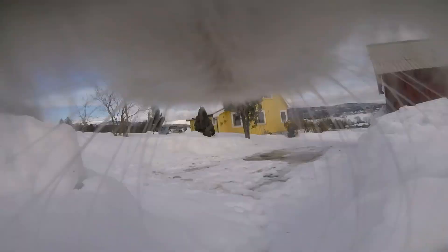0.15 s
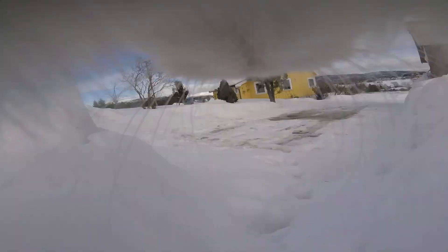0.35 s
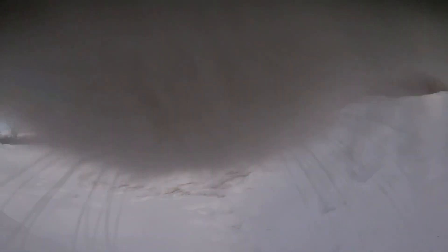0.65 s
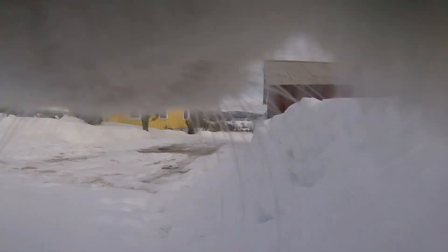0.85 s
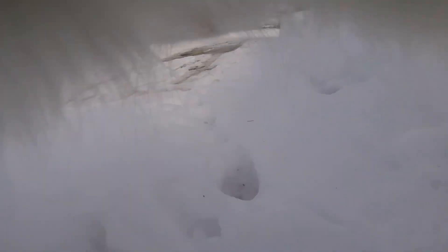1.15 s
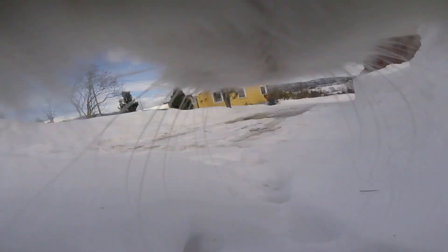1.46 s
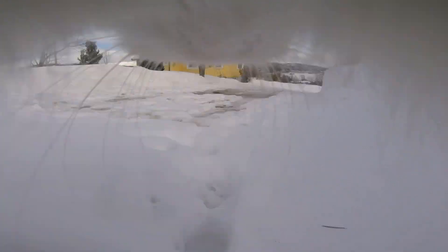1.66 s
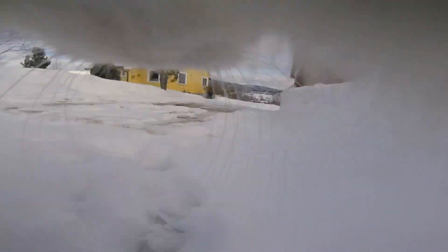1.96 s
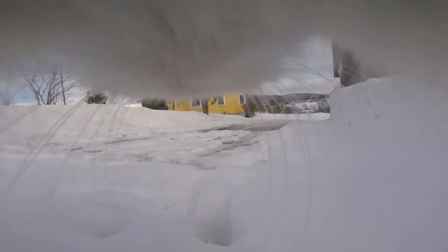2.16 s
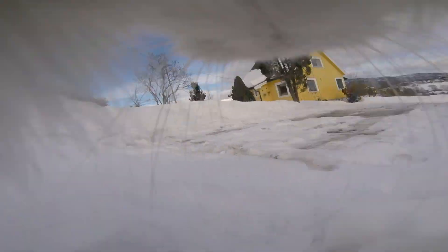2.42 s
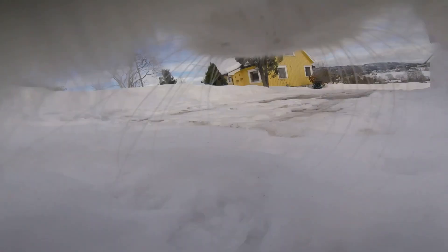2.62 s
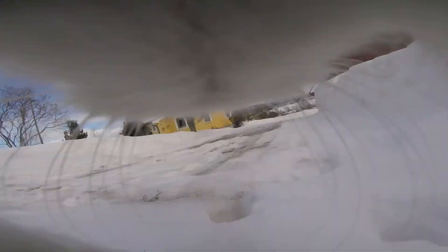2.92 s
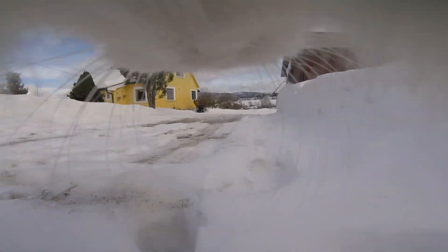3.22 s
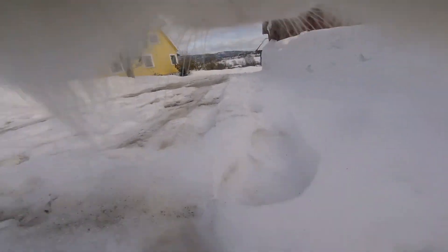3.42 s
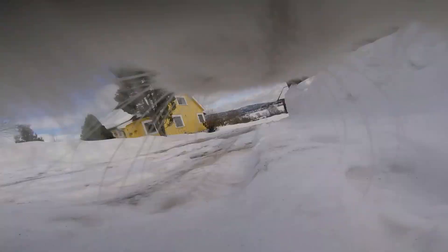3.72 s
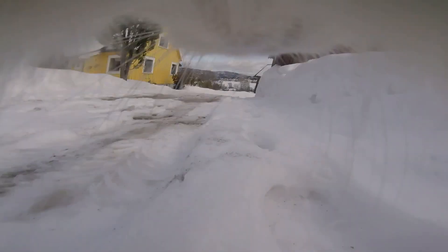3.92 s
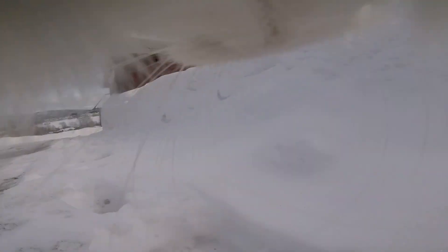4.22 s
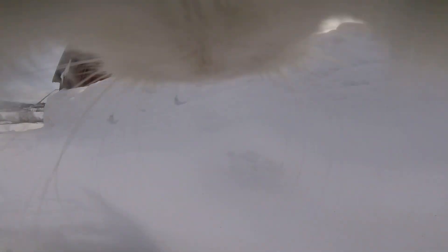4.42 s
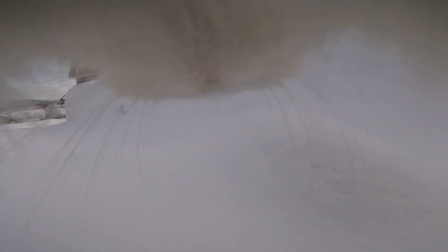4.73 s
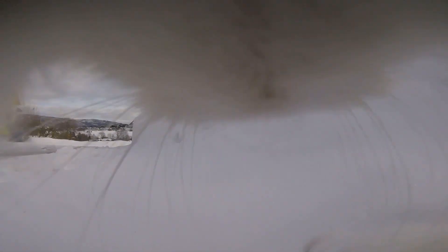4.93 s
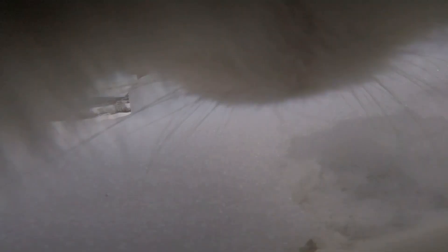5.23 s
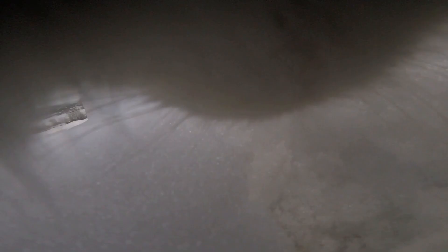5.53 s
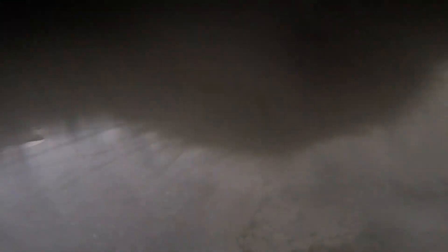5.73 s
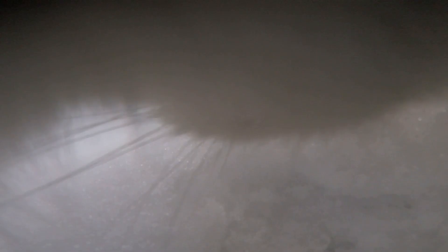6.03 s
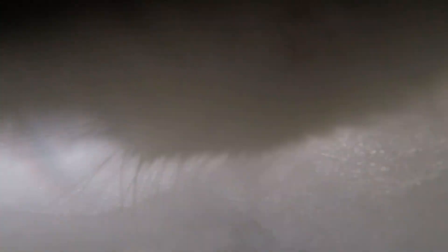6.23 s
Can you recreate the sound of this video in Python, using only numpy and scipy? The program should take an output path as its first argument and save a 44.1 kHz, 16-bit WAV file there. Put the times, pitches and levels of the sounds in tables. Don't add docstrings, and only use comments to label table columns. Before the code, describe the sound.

Very close, dry outdoor sound from a microphone against a cat's chest. Deep rumbling sways and dull knocks come with uneven steps, mixed with soft fur rustle, tiny hard plastic ticks and brief crunches of frozen snow. Activity builds to a heavy jolting passage around the middle, eases to light rubbing and isolated ticks, then a crisp crunch and a last few bumps over faint air hiss.

```python
import sys
import numpy as np
from scipy import signal
from scipy.fft import rfft, irfft, next_fast_len
from scipy.io import wavfile
from scipy.ndimage import uniform_filter1d

SR = 44100
rng = np.random.default_rng(int(sys.argv[2]) if len(sys.argv) > 2 else 0)


def elevation(decibels):
    levels = np.asarray(decibels, float)
    return 10 ** (levels / 20)


def dump(signal):
    limited = np.clip(np.atleast_2d(signal).T, -1, 1)
    pcm = np.round(limited * 32767).astype(np.int16)
    wavfile.write(sys.argv[1], SR, pcm)


N = 280917


def rms_one(x):
    return x / np.sqrt(np.mean(x ** 2) + 1e-20)


def band(x, low_hz, high_hz, order=2):
    return signal.sosfilt(signal.butter(order, [low_hz, high_hz], "band", fs=SR, output="sos"), x)


def soften(x, memory):
    return signal.lfilter([1], [1, -memory], x)


def ring(clicks, hz, t60):
    r = elevation(-60 / (t60 * SR))
    w = 2 * np.pi * hz / SR
    return signal.lfilter([0, np.sin(w)], [1, -2 * r * np.cos(w), r * r], clicks + 1e-18)


def evened(x, share, span_s):
    envelope = np.abs(signal.hilbert(x, next_fast_len(N))[:N])
    swell = uniform_filter1d(envelope, max(round(span_s * SR), 1))
    return rms_one(x / (swell + 1e-9) ** np.clip(share, 0, 1))


def grains(per_s, spread_db, smooth):
    sizes = elevation(spread_db * np.minimum(rng.exponential(1, N), 5)) * rng.choice([-1, 1], N)
    slips = rms_one(sizes * (rng.random(N) < per_s / SR))
    return rms_one(slips + smooth * rng.standard_normal(N))


def swells(rows, rest_db):
    t = np.arange(0, N, 64) / SR
    s, db, rise, fall = np.transpose(rows)[:, :, None]
    fading_db = db - 20 * np.where(t < s, (s - t) / rise, (t - s) / fall)
    power = elevation(2 * rest_db) + elevation(2 * fading_db).sum(axis=0)
    return np.interp(np.arange(N) / SR, t, 10 * np.log10(power))


# centre in Hz, width in Hz, level in dB.
PORT_BANDS = [
    (5443, 1140, 24),
    (7660, 500, -15),
    (4200, 500, 2),
    (6280, 1300, 7),
]


def port(x):
    bands = sum(elevation(db) * band(x, hz - width / 2, hz + width / 2) for hz, width, db in PORT_BANDS)
    return band(bands, 3500, 9000)


# peak in seconds, swing level in dB, time to die by 20 dB in seconds.
SWINGS = [(0.0, -36, .06), (0.32, -33, .1), (0.45, -47, .5), (0.89, -32, .16), (1.02, -44, .1),
          (1.17, -45, .5), (1.45, -40, .4), (1.93, -36, .2), (2.14, -49, .9), (2.41, -25, .3),
          (2.52, -29, .12), (2.66, -34, .2), (2.78, -32, .08), (2.98, -42, .9), (3.22, -36, .12),
          (3.44, -30, .3), (3.49, -29, .04), (3.61, -30, .06), (3.9, -37, .1), (4.44, -42.5, .3),
          (4.82, -47, .3), (5.05, -39, .4), (5.33, -39.5, .15), (5.5, -42, .5), (5.8, -50, .9),
          (6.12, -39, .9), (6.31, -42, .15)]
# peak in seconds, shudder level in dB, time to die by 20 dB in seconds.
SHUDDERS = [(0.2, -49.5, .08), (0.3, -55, .9), (0.8, -54, .3), (1.09, -44, .1), (1.27, -46, .3),
            (1.35, -39, .1), (1.49, -40, .15), (1.68, -50, .5), (2.43, -36.5, .15), (2.64, -40, .09),
            (2.78, -40, .15), (2.99, -39, .07), (3.26, -57, .5), (3.44, -40.5, .1), (3.52, -37, .1),
            (3.6, -34, .07), (3.845, -37, .03), (4.18, -54, .12), (4.44, -46, .2), (4.86, -49, .4),
            (5.29, -46, .1), (5.33, -37, .07), (5.6, -43, .07), (5.77, -54, .5), (6.13, -35, .16),
            (6.37, -35.5, .1)]


def sway():
    rise_s = 0.06
    swing_db = swells([(s, db, rise_s, fall) for s, db, fall in SWINGS], rest_db=-57)
    shudder_db = swells([(s, db, rise_s, fall) for s, db, fall in SHUDDERS], rest_db=-63)

    swing = elevation(swing_db) * evened(band(rng.standard_normal(N), 14.3, 31.7), share=0.68, span_s=0.038)
    swing = rms_one(band(swing, 3.4, 58)) * np.sqrt(np.mean(elevation(swing_db) ** 2))

    rumble = soften(rng.standard_normal(N), 0.995)
    shudder = evened(band(rumble, 33, 127), share=0.59, span_s=0.019)

    opening_step, opening_fall_s = -0.062, 0.011
    opening = opening_step * np.exp(-np.arange(N) / SR / opening_fall_s)
    return swing + elevation(shudder_db - 1.0) * shudder + opening


# frequency in Hz, level in dB per Hz.
HISS_COLOUR = [(60, 2), (200, -4), (500, -9), (1000, -10), (2000, -18), (3200, -35), (4300, -35),
               (5300, -14.5), (8000, -12), (11000, -14.5), (13000, -19.5), (14000, -30)]
# time in seconds, level in dB.
AIR = [
    (0, -76.5),
    (1.2, -74.5),
    (2.5, -72),
    (3.4, -71.5),
    (3.9, -76),
    (4.8, -73.5),
    (5.5, -72),
    (6.37, -70.5),
]


def hiss():
    hz = np.fft.rfftfreq(N, 1 / SR)
    shape_hz, shape_db = np.transpose(HISS_COLOUR)
    colour = elevation(np.interp(np.log(hz + 1), np.log(shape_hz), shape_db, left=-60))
    noise = rms_one(irfft(rfft(rng.standard_normal(N)) * colour, N))

    air_s, air_db = np.transpose(AIR)
    level_db = np.interp(np.arange(N) / SR, air_s, air_db)
    gusts = rms_one(band(rng.standard_normal(N), 1.0, 6.0, order=1))
    return elevation(level_db + 1.5 * gusts) * noise


# peak in seconds, drag level in dB,
# time to grow by 20 dB in seconds, time to die by 20 dB in seconds.
DRAGS = [(0.03, -61.5, .1, .12), (0.252, -51.5, .105, .1), (0.432, -55, .15, .19), (0.83, -57, .14, .16),
         (1.095, -59, .3, .5), (1.3, -45.5, .025, .19), (1.515, -47.5, .1, .14), (1.8, -59, .15, .3),
         (1.868, -50, .1, .17), (1.993, -52.5, .08, .24), (2.44, -47, .13, .22), (2.617, -46, .05, .11),
         (2.77, -54, .09, .1), (3.1, -59, .6, .05), (3.235, -55.5, .17, .05), (3.44, -51, .13, .3),
         (3.57, -53, .3, .07), (3.794, -54, .04, .15), (3.844, -56, .1, .05), (3.97, -58, .14, .055),
         (4.173, -63, .12, .07), (4.35, -64, .15, .28), (4.687, -63, .15, .14), (4.83, -60, .06, .9),
         (5.11, -58, .6, .12), (5.295, -55, .3, .3), (5.47, -56, .1, .22), (5.6, -57, .08, .08),
         (5.939, -60, .4, .25), (6.363, -47.5, .36, .1)]
# peak in seconds, brush level in dB, time to grow
# by 20 dB in seconds, time to die by 20 dB in seconds.
BRUSHES = [(0.03, -73.5, .1, .11), (0.252, -73, .28, .3), (0.437, -72.5, .25, .08), (0.56, -75, .05, .4),
           (0.665, -71, .15, .06), (0.9, -69, .4, .07), (1.025, -70, .06, .1), (1.105, -72, .2, .17),
           (1.275, -62.5, .04, .28), (1.529, -64.5, .12, .09), (1.733, -68, .08, .04),
           (1.873, -66, .13, .35), (2.003, -68, .3, .12), (2.425, -59.5, .1, .17), (2.63, -67, .05, .12),
           (2.67, -67, .1, .03), (2.796, -62.5, .08, .2), (2.94, -66, .07, .7), (3.52, -67, .22, .25),
           (3.794, -69, .08, .13), (3.978, -71, .13, .09), (4.28, -74, .3, .1), (4.432, -75, .1, .16),
           (4.817, -71, .06, .025), (4.875, -73, .03, .9), (4.996, -64, .1, .07), (5.156, -70, .5, .1),
           (5.31, -63.5, .19, .18), (5.475, -66.5, .1, .22), (5.585, -62, .1, .06),
           (5.82, -74, .1, .55),
    (6.134, -64.5, .05, .9),
]


def rub():
    rustle_db = swells(DRAGS, rest_db=-76)
    hiss_db = swells(BRUSHES, rest_db=-90)
    scrape_gain = np.sqrt(elevation(rustle_db - 12.5) ** 2 + elevation(hiss_db - 5) ** 2 + elevation(-81) ** 2)

    coarse = grains(per_s=600, spread_db=5.0, smooth=0.59)
    fine = grains(per_s=2500, spread_db=4.0, smooth=1.27)
    gritty = np.clip((rustle_db + 66) / 18, 0, 1)
    drag = gritty * coarse + np.sqrt(1 - gritty ** 2) * rng.standard_normal(N)

    rustle = evened(band(soften(drag, 0.975), 93, 1140), share=0.91, span_s=0.09)
    scrape = rms_one(band(soften(fine + 0.2 * drag, 0.75), 1130, 3630))
    brush = rms_one(port(fine))
    return elevation(rustle_db) * rustle + scrape_gain * scrape + elevation(hiss_db) * brush


# peak in seconds, grind level in dB,
# time to grow by 20 dB in seconds, time to die by 20 dB in seconds.
SCRAPES = [(.03, -70, .05, .08), (.665, -73, .06, .05), (.875, -71, .08, .12), (1.295, -62, .03, .08),
           (1.75, -70, .1, .05), (2.0, -70, .1, .1), (2.40, -64, .08, .08), (2.47, -62, .04, .05),
           (2.80, -64, .04, .06), (2.85, -67, .03, .04), (2.93, -68, .05, .1), (3.09, -69, .05, .04),
           (3.505, -58, .08, .04), (3.63, -61, .06, .03), (5.365, -59, .03, .03), (6.17, -70, .05, .1)]


def creak():
    grit = grains(per_s=1500, spread_db=4.5, smooth=0.6)
    body = band(grit, 1900, 2350) + 0.6 * band(grit, 1000, 3400)
    return elevation(swells(SCRAPES, rest_db=-100)) * rms_one(body)


# time in seconds, peak level in dB, pitch in Hz.
SNAPS = [(.0324, -57, 1900), (.7447, -56, 1320), (.8754, -53, 2160), (1.0874, -52, 1320),
         (1.2535, -43, 5500), (1.2944, -46, 2120), (1.3134, -48, 2390), (1.4341, -52, 1620),
         (1.4664, -54, 1300), (1.486, -49, 1900), (1.5274, -48, 1310), (1.7512, -41, 2100),
         (1.7978, -54, 1680), (2.2039, -58, 2110), (2.3655, -51, 1640), (2.4644, -49, 1200),
         (2.4704, -47, 1700), (2.7591, -49, 1700), (2.7784, -49, 1200), (2.7985, -50, 2110),
         (2.8024, -49, 2190), (2.9158, -52, 3700), (2.9214, -51, 3550), (2.9354, -51, 2140),
         (2.9871, -42, 1200), (2.9904, -40, 2000), (3.0074, -33, 2800), (3.0124, -38, 2900),
         (3.0194, -36, 1150), (3.0264, -36, 3250), (3.1587, -54, 1100), (3.2355, -54, 1200),
         (3.4414, -45, 1000), (3.4994, -45, 2100), (3.5114, -45, 1800), (3.5364, -42, 1420),
         (3.6064, -43, 2140), (3.6195, -45, 2000), (4.6867, -54, 2100), (4.799, -47, 1360),
         (4.9487, -56, 5220), (4.9694, -52, 5270), (5.0165, -40, 1360), (5.1248, -52, 5400),
         (5.3095, -45, 2500), (5.3148, -34, 7400), (5.3195, -32, 2800), (5.315, -36, 3000),
         (5.337, -42, 2900), (5.3264, -37, 5430), (5.327, -38, 2700), (5.3454, -40, 2500),
         (5.3655, -37, 2700), (5.370, -41, 2600), (5.3674, -38, 5730), (5.3944, -46, 5550),
         (6.123, -38, 1280), (6.361, -50, 3300), (6.363, -50, 5500)]


def snaps():
    length = 600
    out = np.zeros(N + length)
    t = np.arange(length) / SR
    for s, peak_db, hz in SNAPS:
        tone = np.sin(2 * np.pi * hz * t) * np.exp(-hz * t / 4.0)
        crack = rng.standard_normal(length) * np.exp(-t / 0.0006)
        out[round(s * SR):][:length] += elevation(peak_db - 2.5) * (tone + 0.2 * crack)
    return band(out[:N] + 1e-18, 600, 7500, order=3)


# time in seconds, then the levels in dB
# of the 2 kHz part, the low part, the upper part and the bright part.
TICKS = [(0.112, -49.5, -60, -57, -71), (0.1921, -44, -56.5, -63, -62), (0.3925, -51.5, -55, -72, -75),
         (0.5768, -50, -61, -74, -78), (0.8299, -42, -56, -51, -52.5), (1.0116, -44, -54, -73, -63),
         (1.1125, -50.5, -55, -55.5, -70), (1.4331, -52, -57, -80, -58), (1.7583, -39, -46.5, -47, -42.5),
         (1.8585, -40.5, -59, -46, -56), (1.9789, -51, -48, -73, -65), (2.3391, -53, -53.5, -74, -73),
         (2.6024, -34.5, -52, -37.5, -44), (2.7755, -48, -54, -60, -52), (2.8615, -38, -49.5, -48, -41),
         (3.783, -41, -48, -69, -61), (3.9729, -33.5, -46, -47.5, -51), (3.9795, -33, -41, -41.5, -36.5),
         (4.1633, -48, -58, -69, -84), (4.3455, -44.5, -61, -77, -79), (4.6678, -50.5, -62, -74, -75),
         (5.0165, -50, -43, -49, -40), (5.2709, -44, -50, -70, -60), (6.123, -33, -45, -51, -56),
         (1.2667, -38.5, -47.5, -52, -63), (1.284, -44, -48, -55, -55), (1.3547, -41, -45, -50, -55),
           (2.43, -43, -46, -47, -48), (3.0025, -47, -42, -46, -51), (3.006, -49, -36, -42, -45),
           (3.0153, -36.5, -38.5, -39, -49), (3.0232, -41, -43, -39.5, -38), (3.4116, -57, -60, -62, -55),
           (3.5174, -48, -48, -66, -54), (3.8477, -52, -60, -60, -52), (3.5711, -30.5, -43, -34.5, -42),
           (3.5785, -41, -41, -39.5, -58), (3.5962, -43, -39.5, -53, -53), (3.6262, -36.5, -58, -46, -41),
           (3.6344, -41, -44, -45, -52), (4.813, -49, -55, -62, -59), (4.8673, -37.5, -45.5, -45.5, -54),
           (4.8714, -42, -42.5, -46.5, -50), (5.3395, -56, -46, -60, -58), (6.132, -49, -60, -52, -61)]
# frequency in Hz, level in dB, time to die by 60 dB in seconds.
MOUNT = [
    [(2055, -4, 0.012), (2484, -11, 0.0087)],
    [(1440, 0, 0.0099), (1770, -8, .008)],
    [(2960, 6.5, 0.0025), (3720, -0.5, 0.0041)],
    [(4970, 0.5, .006), (6000, -0.5, 0.0028), (7600, -11, 0.005), (8960, -65, 0.0017)],
]


def ticks():
    s, *parts_db = np.transpose(TICKS)
    out = np.zeros(N)
    for part_db, modes in zip(parts_db, MOUNT):
        for k, (hz, level_db, t60) in enumerate(modes):
            clicks = np.zeros(N)
            chance_db = 1.95 * rng.standard_normal(len(s))
            clicks[(s * SR).astype(int)] = elevation(part_db + level_db + chance_db)
            contact = band(clicks + 1e-18, hz / 1.546, min(hz * 1.6, 9500.0))
            strike = rms_one(contact) * np.std(clicks)
            out += (-1) ** k * ring(strike, hz, t60) * 0.56
    return out


# start in seconds, length in seconds,
# then the levels in dB of the low part, the mid part and the bright part.
CRUNCHES = [(0.168, 0.045, -67, -76, -65.5), (1.249, 0.01, -60, -62, -60), (1.285, 0.022, -53, -60, -68),
            (2.364, 0.073, -57, -64, -65), (2.612, 0.071, -52, -59.5, -69), (2.986, 0.014, -42, -52, -60),
            (3.001, 0.036, -38.5, -47.5, -53), (3.432, 0.052, -43.5, -58.5, -62),
            (3.48, .07, -56, -57.5, -66), (3.572, 0.075, -46.5, -57.5, -60), (4.792, 0.014, -59, -63, -59),
            (4.872, .047, -82, -71, -62), (5.313, 0.012, -46, -46, -39), (5.321, 0.052, -48, -54, -50.5),
            (5.372, 0.031, -56, -60.5, -59), (6.121, 0.015, -50, -60, -60), (6.360, 0.014, -60, -60, -60)]


def crunches():
    t = np.arange(N) / SR
    gains = np.zeros((4, N))
    for s, length, *parts_db in CRUNCHES:
        gate = np.clip((t - s) / 0.0013, 0, 1) * np.clip((s + length - t) / 0.0035, 0, 1)
        gate = gate * elevation(3.0 * (0.5 - np.clip((t - s) / length, 0, 1)))
        top_db = 1.25 * parts_db[-1] + 8
        gains += elevation(np.array([*parts_db, top_db]))[:, None] * gate

    jolts = grains(per_s=600, spread_db=1.5, smooth=0.3)
    cracks = jolts + grains(per_s=2500, spread_db=3.0, smooth=0.6)
    low = band(soften(jolts, 0.95), 100, 920)
    mid = band(cracks, 1000, 2900)
    bright = port(cracks)
    top = band(cracks, 6500, 8800, order=3)
    return sum(gain * rms_one(part) for gain, part in zip(gains, (low, mid, bright, top)))


# time in seconds, peak level in dB, pitch in Hz.
KNOCKS = [(0.172, -43, 511), (0.792, -46, 447), (1.053, -48, 373), (1.09, -41, 504), (1.2475, -41, 513),
          (1.285, -36, 500), (1.298, -32, 440), (1.304, -37, 500), (1.354, -33.5, 425), (1.797, -45, 470),
          (2.616, -31.5, 480), (3.98, -42, 500), (3.011, -27, 444), (2.9885, -24, 170), (3.432, -33, 670),
          (3.543, -38.5, 382), (3.631, -33, 513), (3.737, -45, 398), (3.745, -46, 490), (3.846, -39.5, 342),
          (4.175, -44, 355), (4.687, -50, 550), (4.872, -42, 600), (5.124, -35.5, 443), (5.316, -39.5, 433),
          (5.589, -47, 393), (6.114, -48, 353), (2.8605, -46, 600), (2.872, -47, 420), (3.003, -30, 260),
          (3.097, -50, 700), (3.134, -53, 800), (3.158, -50, 620), (3.237, -47, 600), (3.467, -37, 700),
          (3.537, -41, 850), (3.596, -34, 750), (5.319, -35, 200), (5.328, -36, 190)]
# time in seconds, peak level in dB.
THUDS = [(0.239, -44.5), (0.828, -47), (2.774, -36), (3.002, -36), (3.155, -47), (3.236, -43), (3.41, -31),
         (3.466, -40), (3.595, -34), (4.482, -50), (4.795, -44), (4.812, -42), (6.131, -41)]
# time in seconds, peak level in dB, pitch in Hz.
NUDGES = [(0.547, -56, 283), (0.746, -55, 250), (1.009, -51, 336), (1.2, -49, 250), (1.251, -43, 528),
          (1.431, -52, 339), (1.482, -48, 296), (1.755, -45, 261), (1.87, -42, 328), (1.998, -45, 307),
          (2.369, -43, 304), (2.459, -40, 250), (2.468, -43, 288), (2.765, -39, 288), (2.859, -48, 614),
          (2.87, -48, 272), (2.92, -51, 466), (2.958, -48, 293), (2.996, -29, 250), (3.014, -29, 460),
          (3.019, -31, 851), (3.024, -33, 288), (3.052, -50, 250), (3.097, -50, 350), (3.441, -37, 253),
          (3.481, -42, 304), (3.637, -39, 250), (3.782, -46, 315), (4.343, -54, 291), (4.874, -44, 380),
          (5.269, -48, 280), (5.337, -33, 554), (5.353, -38, 285), (5.359, -40, 250), (5.367, -40, 256),
          (5.383, -41, 250), (5.394, -46, 350), (5.801, -57, 355), (5.885, -55, 312)]


def knocks():
    length, thud_hz = 2000, 290
    out = np.zeros(N + length)
    t = np.arange(length) / SR
    slap = np.sin(2 * np.pi * 900.0 * t) * np.exp(-t / 0.0018)
    thuds = [(s, db, thud_hz) for s, db in THUDS]
    nudges = [(s, db - 4.0, hz) for s, db, hz in NUDGES]
    blows = KNOCKS + thuds + nudges
    for (s, peak_db, hz), sign in zip(blows, rng.choice([-1, 1], len(blows))):
        cycles = hz * t
        thump = np.sin(2 * np.pi * cycles) * np.sqrt(cycles) * np.exp(-1.6 * cycles)
        blow = thump / np.abs(thump).max() + 0.3 * slap
        out[round(s * SR):][:length] += sign * elevation(peak_db) * blow
    return out[:N]


# time in seconds, peak level in dB, pitch in Hz, direction (1 or -1).
LURCHES = [
    (0.271, -16.5, 18.5, 1),
    (.86, -28, 18, 1),
    (1.353, -19.5, 17, 1),
    (1.912, -22, 19, -1),
    (2.445, -19, 30, 1),
    (3.572, -12.5, 25, 1),
    (4.803, -30, 45, 1),
]


def lurches():
    s, db, hz, direction = np.transpose(LURCHES)[:, :, None]
    squared = (np.pi * hz * (np.arange(N) / SR - s)) ** 2
    return np.sum(direction * elevation(db) * (1 - 2 * squared) * np.exp(-squared), axis=0)


# start in seconds, length in seconds, level in dB, centre in Hz.
SWIPES = [(.63, .05, -79, 3600), (1.015, .02, -66, 2000), (1.088, .008, -67, 2600),
          (1.433, .014, -64, 1900), (1.71, .028, -67, 3300), (1.76, .015, -68, 2000),
          (2.758, .004, -61, 3000), (3.516, .004, -58, 5500), (3.536, .004, -61, 6000),
          (3.689, .006, -68, 5800), (3.739, .01, -72, 5500), (3.745, .004, -58, 1300),
          (3.779, .003, -63, 4200), (3.979, .003, -52, 7400), (4.813, .008, -62, 2200)]


def swipes():
    width = 1.16
    t = np.arange(N) / SR
    grit = grains(per_s=4000, spread_db=3.0, smooth=1.1)
    out = np.zeros(N)
    for s, length, db, hz in SWIPES:
        gate = np.clip(np.minimum(t - s, s + length - t) / 0.0015, 0, 1)
        out += elevation(db) * gate * rms_one(band(grit, hz / width, hz * width))
    return out


def scene():
    housing = sway() + lurches() + ticks() + knocks()
    touch = rub() + creak() + swipes()
    crust = crunches() + snaps()
    return (housing + touch + crust + hiss())[None]


def low_pass(x):
    return signal.sosfilt(signal.butter(12, 14060, fs=SR, output="sos"), x)


def record(dry):
    cut = signal.sosfilt(signal.butter(10, 13800, fs=SR, output="sos"), dry)
    return low_pass(cut)


dry = scene()
out = record(dry)
dump(out)
```